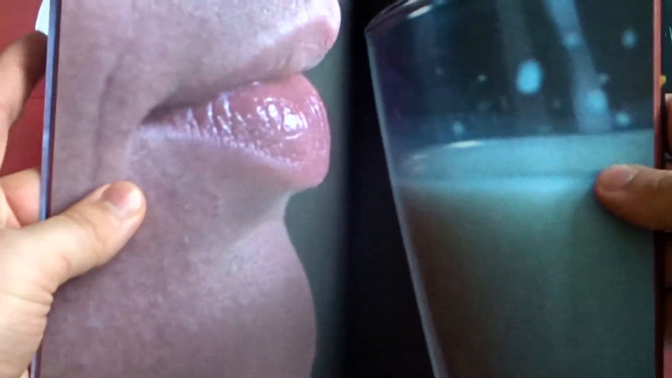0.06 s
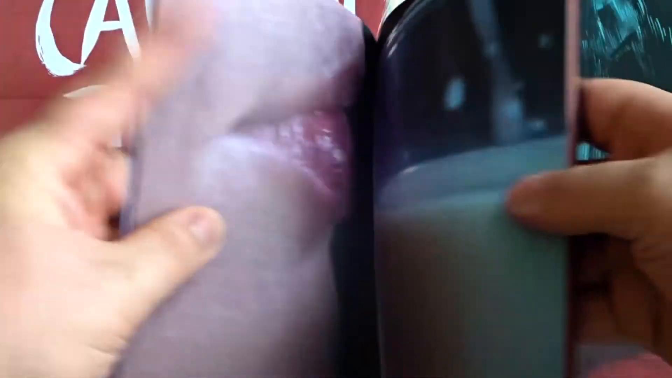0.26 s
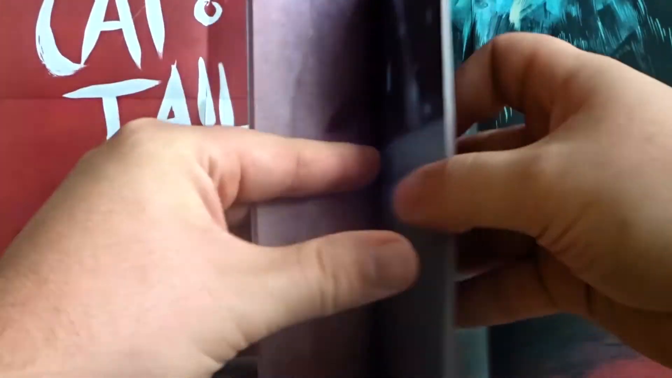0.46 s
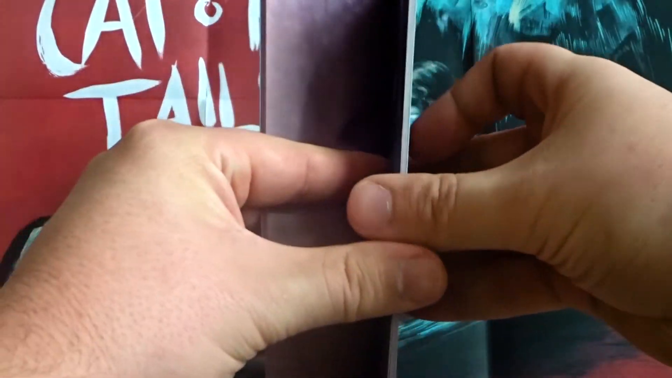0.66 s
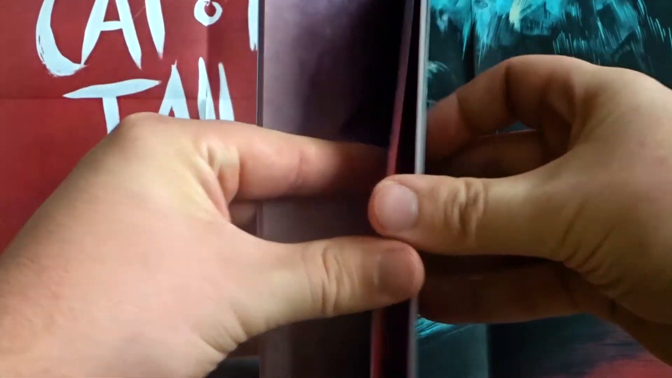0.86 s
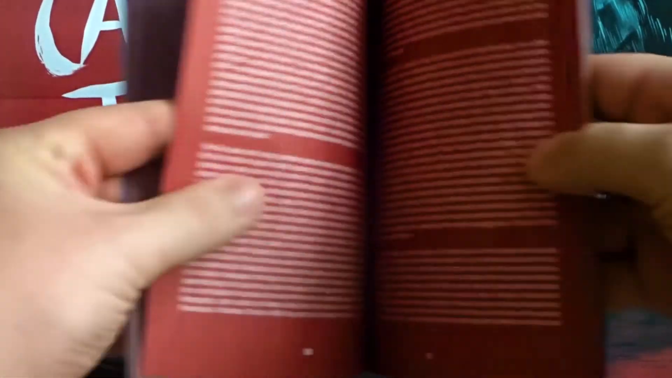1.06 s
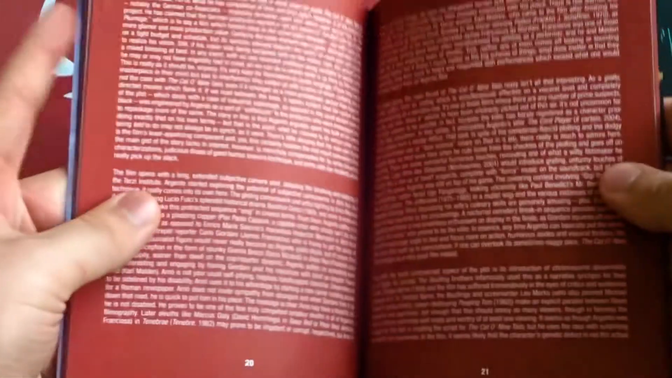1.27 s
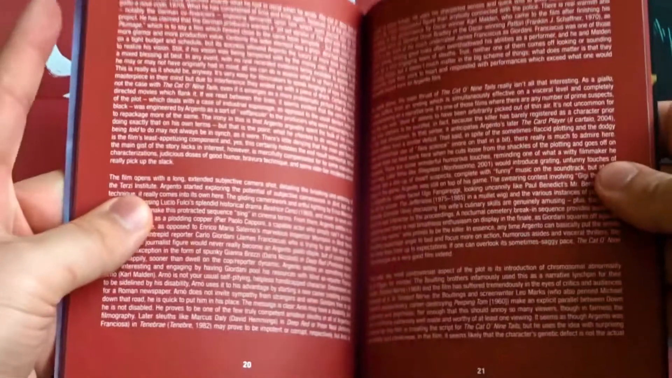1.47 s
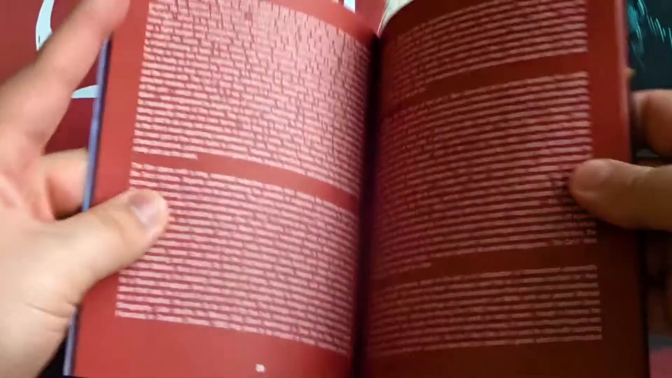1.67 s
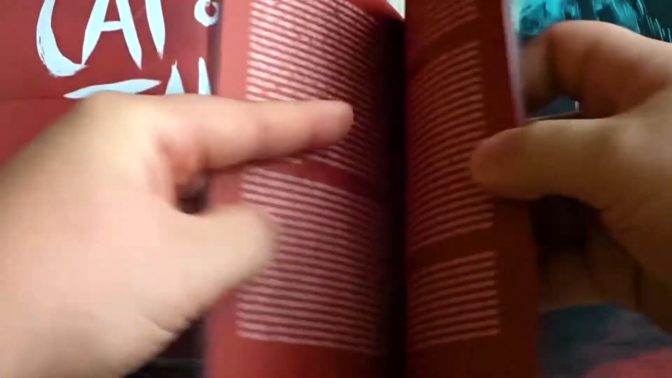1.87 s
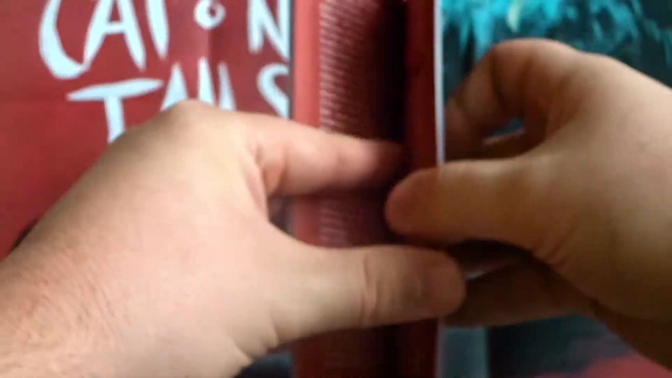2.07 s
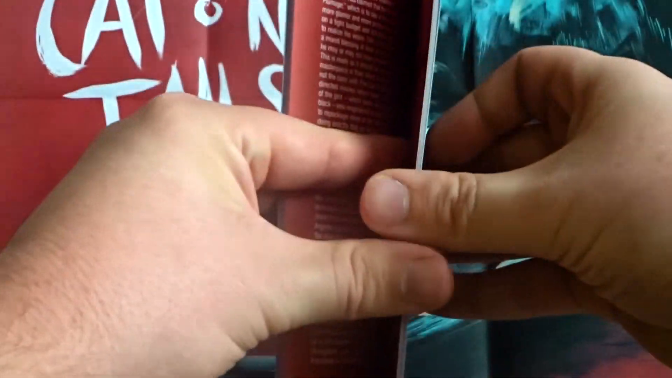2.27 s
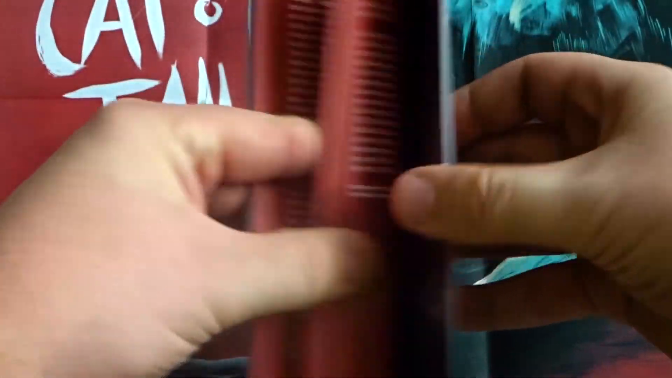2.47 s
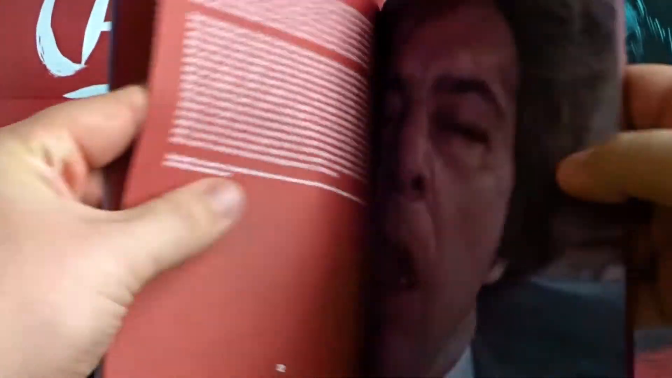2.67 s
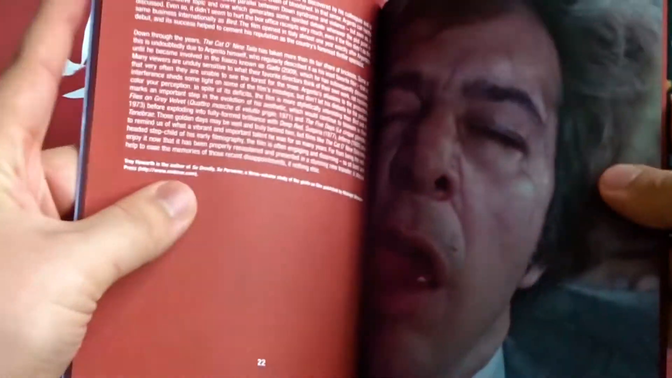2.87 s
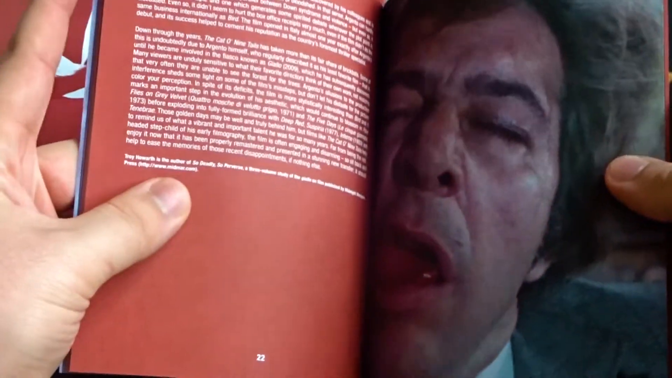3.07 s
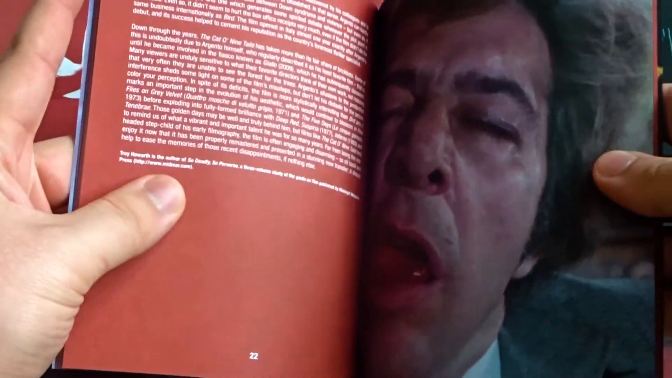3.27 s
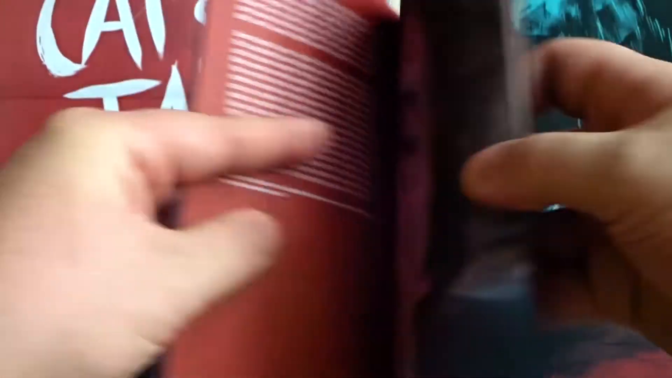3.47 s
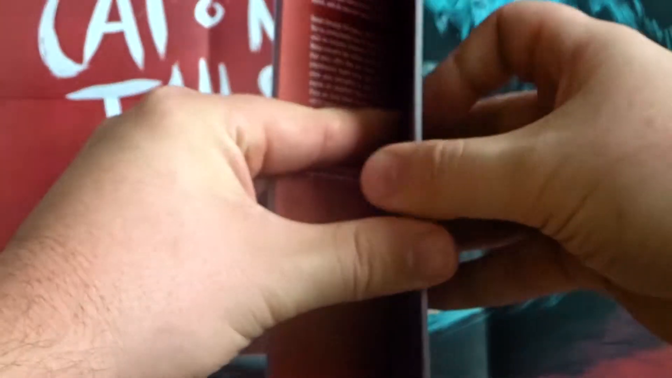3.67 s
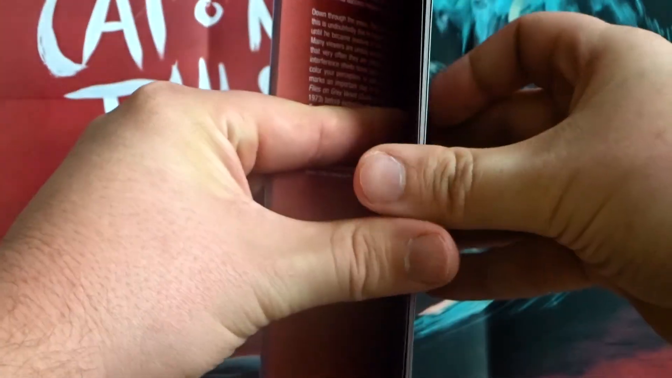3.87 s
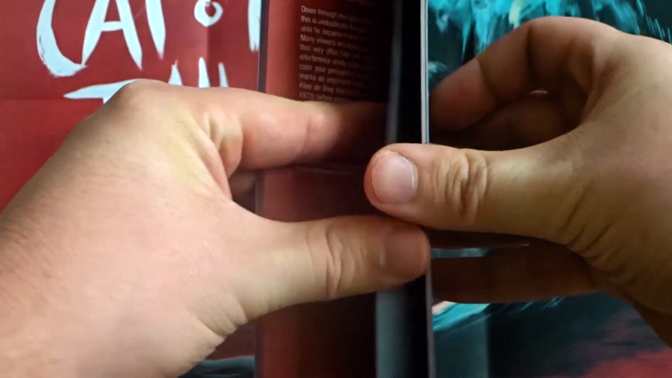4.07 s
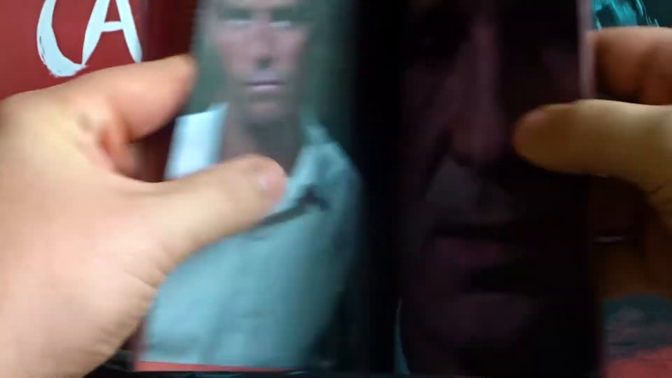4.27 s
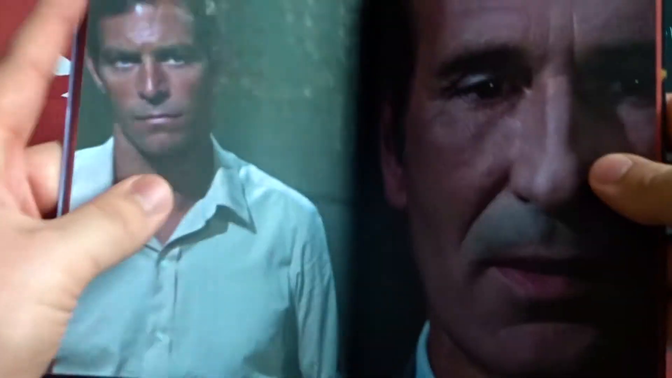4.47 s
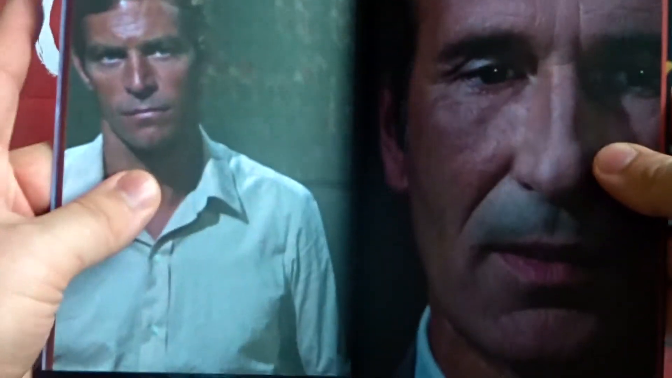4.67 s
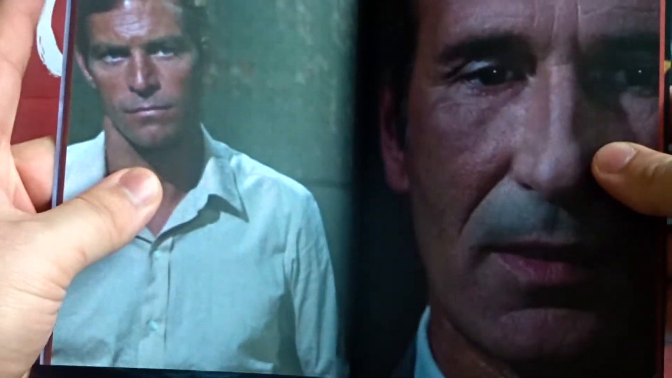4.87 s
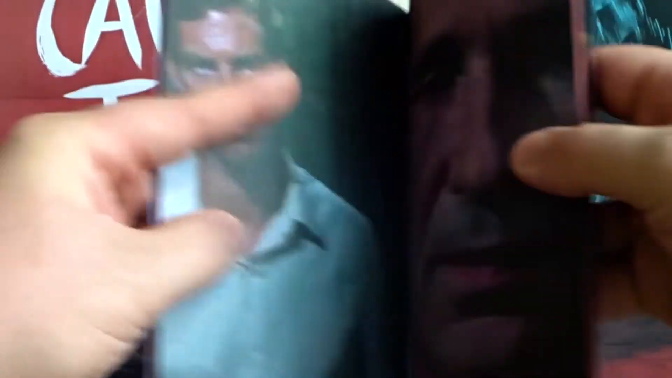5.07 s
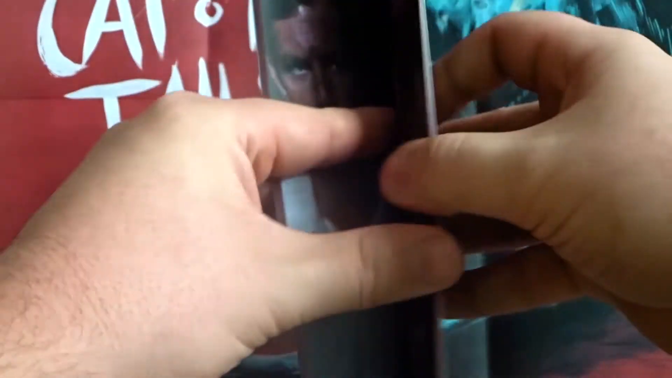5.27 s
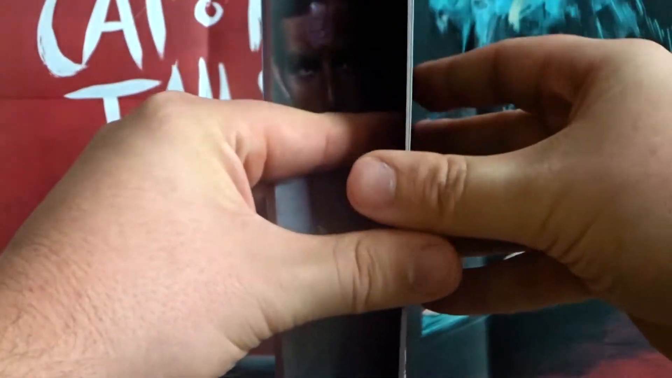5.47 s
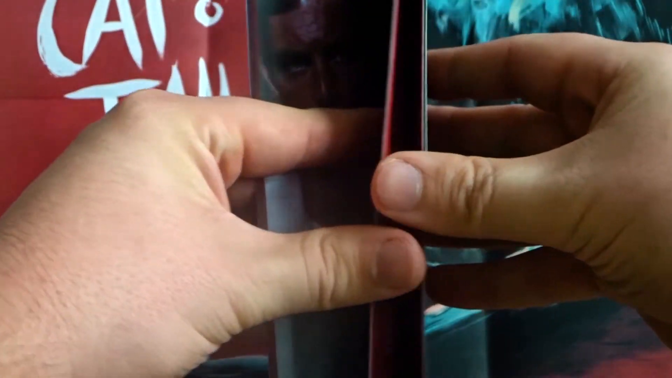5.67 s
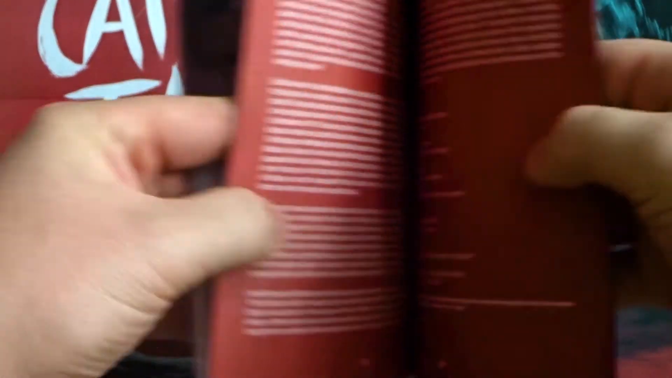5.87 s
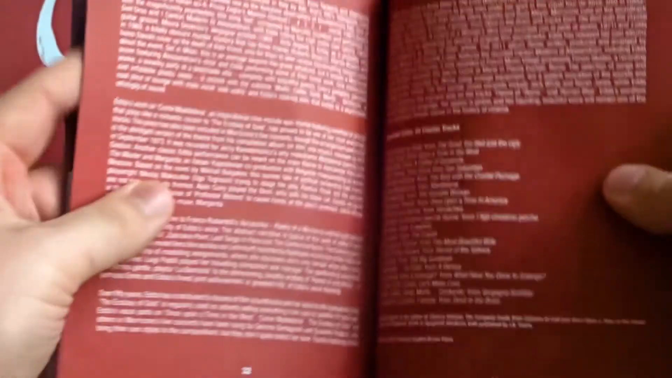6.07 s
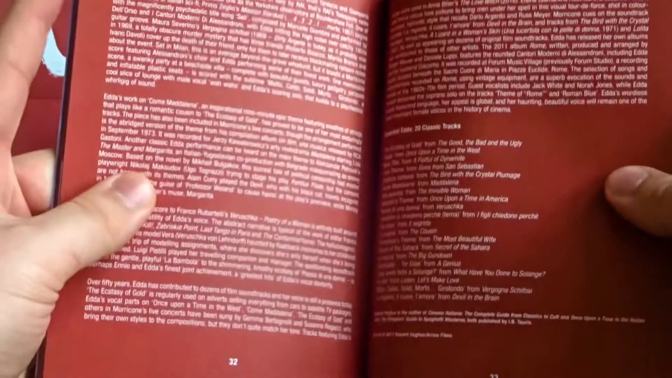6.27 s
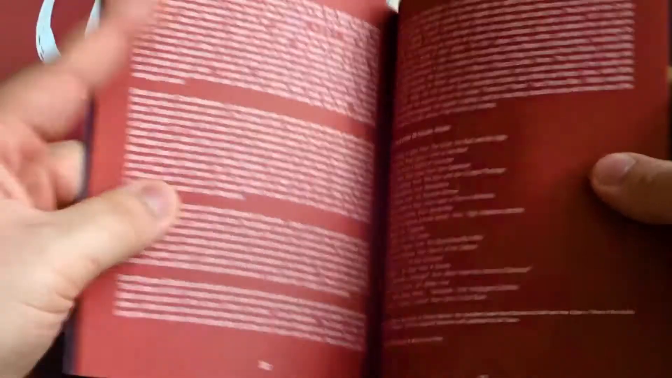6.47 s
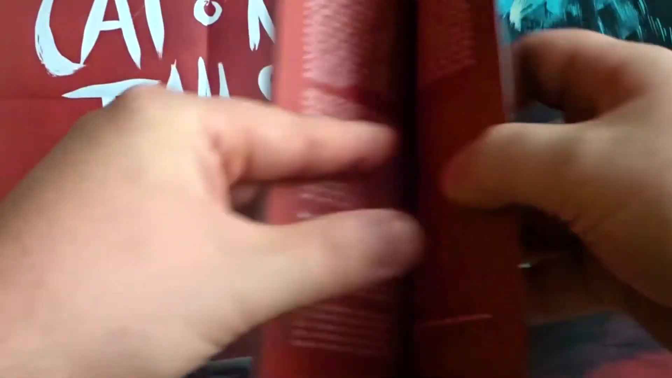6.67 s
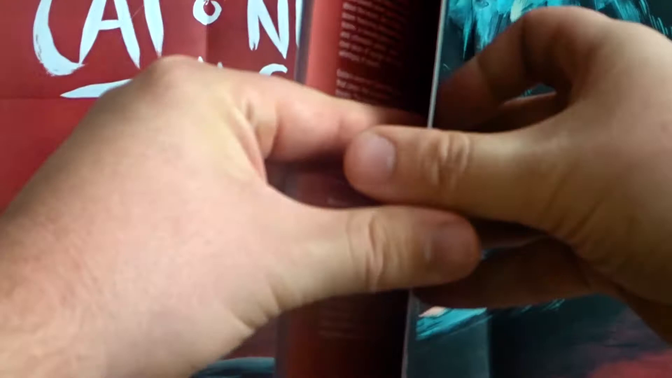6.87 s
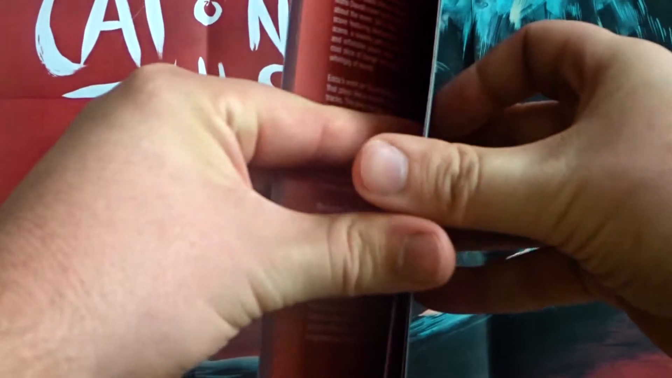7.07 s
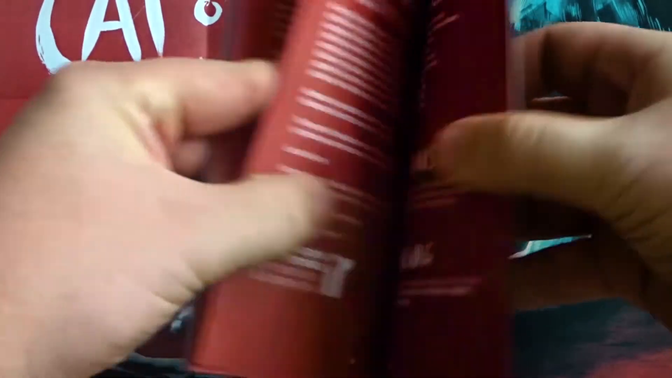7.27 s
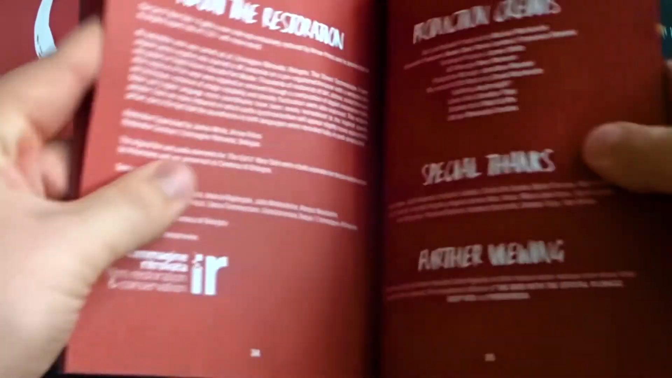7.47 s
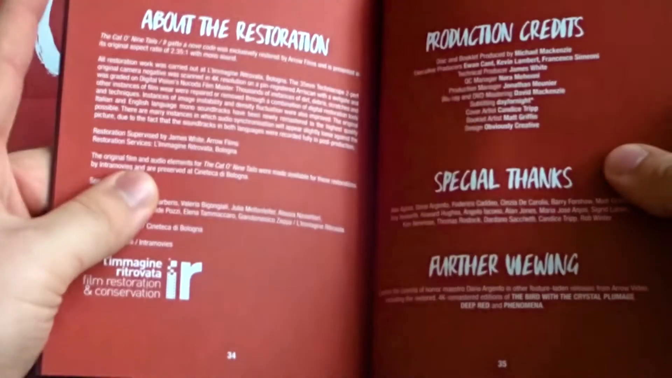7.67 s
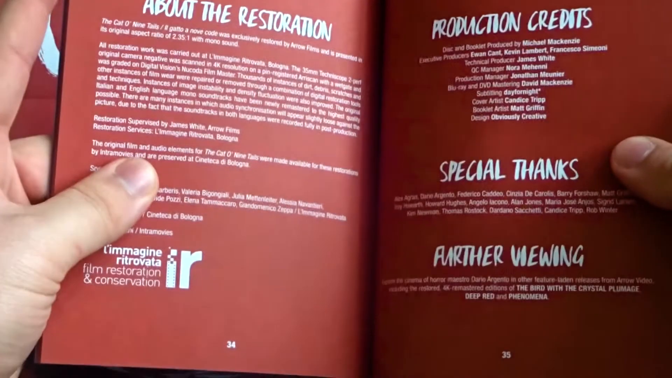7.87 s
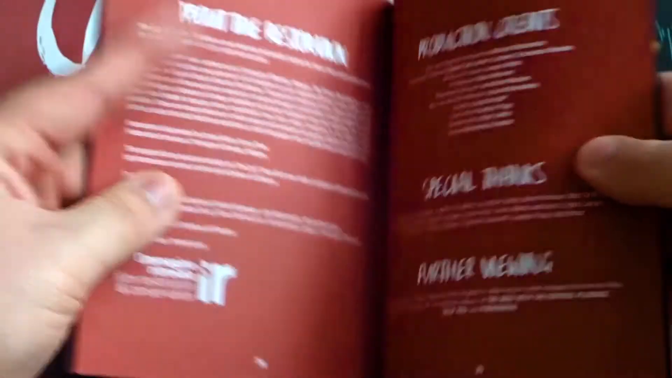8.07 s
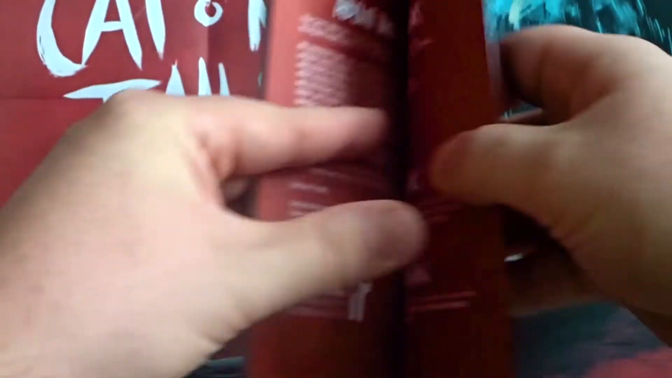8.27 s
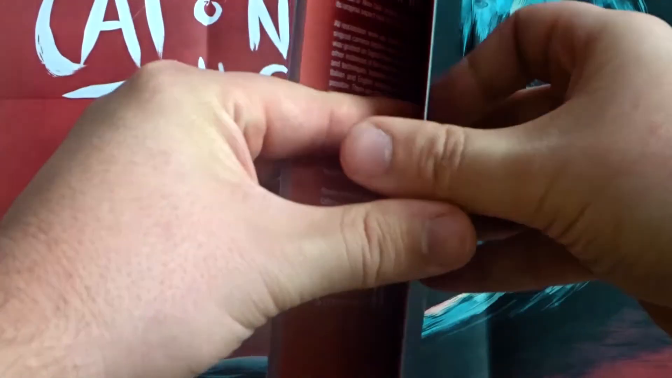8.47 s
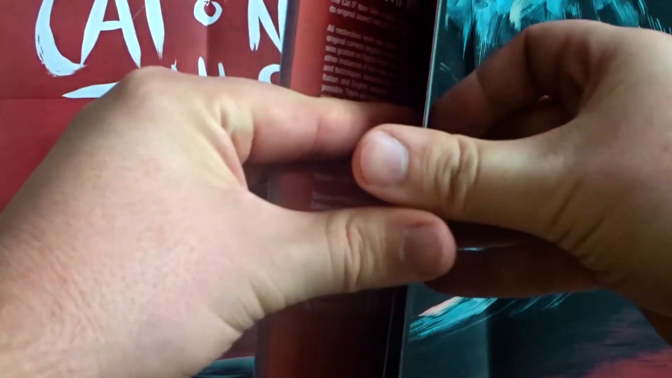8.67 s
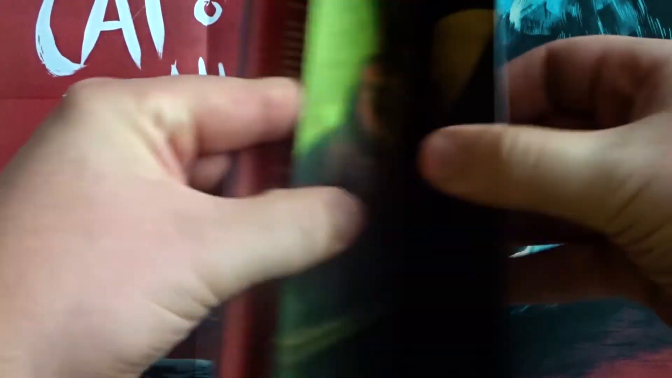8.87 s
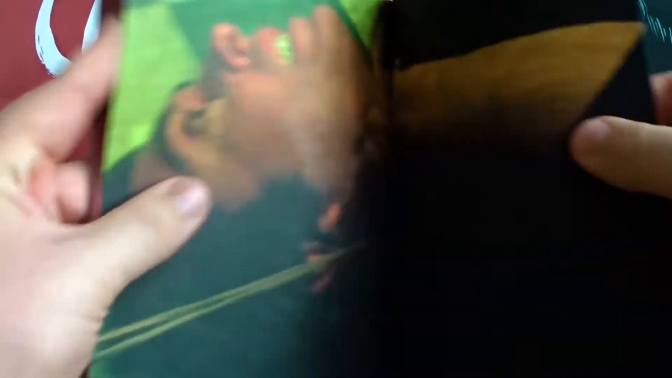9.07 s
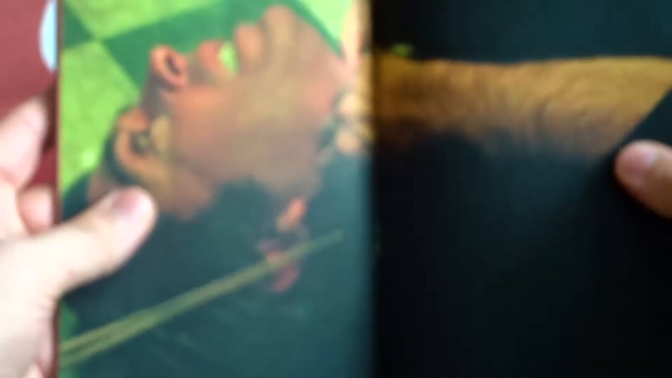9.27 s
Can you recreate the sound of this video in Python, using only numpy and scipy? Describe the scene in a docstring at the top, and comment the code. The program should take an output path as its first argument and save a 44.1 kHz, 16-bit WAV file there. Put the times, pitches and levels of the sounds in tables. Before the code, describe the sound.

A glossy booklet is leafed through by hand, very close to a stereo microphone in a small quiet room. It starts with light finger rubs and a soft sheet rustle from 0.2 to 0.45 s. At 1.0 s a page edge ticks off the thumb, knocks, and sweeps over in a bright crinkly swish until 1.33. Small taps and rubs follow around 1.4 to 2.1. A sharper flick at 2.55 leads into another swish until 2.9, then quiet rustles near 3.5. The strongest snap comes at 4.2, with a crisp slide to 4.54. Rubbing near 5.1 and 5.4 precedes a softer, looser turn at 5.9 to 6.25. More handling at 6.6, a clicking turn at 7.3 to 7.67, gentle rubs at 8.1 to 8.4, and a last quick flick and swish at 8.9 to 9.2. Faint fan hum, airy rush and hiss continue throughout.

```python
"""Hands turn the glossy pages of a booklet close to a small stereo microphone in a quiet room.
Rubbing fingers, bent edges and sliding pages hiss as noise grains and ring the air wedge between the sheets.
Landing pages and tapping fingers knock, thud and crack; page edges slip off the thumb in bursts of ticks;
moving sheets whistle briefly. All are filtered noise, returned by table and walls as sparse echoes.
Behind them the room and a distant fan hum and rush, and the microphone hisses."""
import sys
import numpy as np
from scipy import signal
from scipy.fft import rfft, irfft, next_fast_len
from scipy.io import wavfile
from scipy.ndimage import uniform_filter1d

SR = 44100
rng = np.random.default_rng(int(sys.argv[2]) if len(sys.argv) > 2 else 0)


def transcribe(u):
    """Save the signal u as a 16-bit wav file named by the first command-line argument.

    u: samples, shape (n,) or (channels, n), limited to [-1, 1]; the rate is SR.
    q: integer samples, one column per channel.
    """
    v = np.clip(np.atleast_2d(u).T, -1, 1)
    q = np.round(v * 32767).astype(np.int16)
    wavfile.write(sys.argv[1], SR, q)


N = 411453  # length [samples]


def gain_of(db):
    """Amplitude factor of a level."""
    return 10 ** (np.asarray(db) / 20)


def evened(x):
    """Scaled to rms 1."""
    return x / np.sqrt(np.mean(x ** 2) + 1e-20)


def peaked(x):
    """Scaled to peak 1."""
    return x / abs(x).max()


def read(points, hz):
    """Value of a spectrum table, straight on a log-frequency axis."""
    f, value = np.transpose(points)
    return np.interp(np.log(hz + 1), np.log(f + 1), value)


def add(mix, start, sound):
    """Mixes a sound in at time start [s]."""
    part = mix[round(start * SR):][:len(sound)]
    part += sound[:len(part)]


def resonate(x, hz, width):
    """A resonance: shifts the steady or gliding pitch hz down to zero, smooths, and shifts back."""
    turn = np.exp(2j * np.pi * np.cumsum(hz * np.ones(x.shape[-1])) / SR)
    r = np.exp(-np.pi * width / SR)
    smooth = signal.lfilter([1 - r], [1, -r], x / turn + 1e-18)
    return 2 * (turn * smooth).real


def band(x, hz, width):
    """Two resonances in a row, the second twice as wide."""
    return resonate(resonate(x, hz, width), hz, 2 * width)


def coloured(x, points):
    """Filters a long sound by a (frequency [Hz], level [dB]) table."""
    size = next_fast_len(x.shape[-1])
    gain = gain_of(read(points, np.fft.rfftfreq(size, 1 / SR)))
    return irfft(rfft(x, size) * gain, size)[..., :x.shape[-1]]


def bright(x, hz):
    """Keeps what lies above hz."""
    return signal.sosfilt(signal.butter(N=2, Wn=hz, btype="high", fs=SR, output="sos"), x)


def room_air(patchy_db=1.8, air_db=-54.5, microphone_db=-69):
    """Steady air and microphone hiss, with the fuzzy hum and rush of a distant fan, all from one stereo noise."""
    # spectrum of the room air: (frequency [Hz], relative density [dB per Hz])
    air_points = [(12, -23), (20, -12), (86, -8), (161, -4), (205, -6.5), (240, -3.5), (408, -7.5),
                  (476, -6.5), (509, -9.5), (1060, -13), (1540, -13.5), (2200, -17.5), (4000, -25.5),
                  (5200, -31.5), (8800, -120)]
    # left-right likeness of the room air: (frequency [Hz], correlation [-1 to 1])
    likeness_points = [(60, 1), (130, 0.65), (290, 0.31), (640, -0.39), (1410, -0.37), (3100, -0.58),
                       (6820, 0.47), (15000, 1.0)]
    # hum of the fan, alike on both sides: (frequency [Hz], width [Hz], level [dB])
    hum_bands = [(117.3, 6.7, -73), (160.1, 7.8, -71.5), (238.9, 9.7, -72.5)]
    # whistling air of the fan: (frequency [Hz], width [Hz], level [dB])
    rush_bands = [(1580, 200, -68), (1830, 300, -68)]
    frames, hz = N // 512 + 5, np.fft.rfftfreq(2048, 1 / SR)
    a, b, c, d, patches = rng.standard_normal((frames, 1025, 5)).T
    patches = evened(uniform_filter1d(uniform_filter1d(patches, 20, axis=0), 8, axis=1))
    likeness = np.clip(read(likeness_points, hz), -1, 1)[:, None]
    left = a + 1j * b
    right = likeness * left + np.sqrt(1 - likeness ** 2) * (c + 1j * d)
    z = np.array([left, right]) * gain_of(patchy_db * patches)
    white = signal.istft(z, nperseg=2048, noverlap=1536)[1][:, :N]
    air = gain_of(air_db) * evened(coloured(white, air_points))
    hum = sum(gain_of(db) * evened(band(white[0], f, width)) for f, width, db in hum_bands)
    blended = white + 0.43 * white[::-1]  # each side takes in some of the other
    rush = sum(gain_of(db) * evened(band(blended, f, width)) for f, width, db in rush_bands)
    return air + hum + rush + gain_of(microphone_db) * evened(bright(white, 2000))


def short_stroke(start, length, start_db, end_db, wedge_db, hz, shine_db):
    """The hiss runs straight from start to end while the wedge swells and sinks and its pitch climbs."""
    share = 0.56  # the wedge rings most at this share of a stroke
    ends_db, glide = -11, 0.17  # wedge level at both ends re its top [dB], whole climb as a share of hz
    return [(start, start_db, wedge_db + ends_db, hz * (1 - share * glide), shine_db),
            (start + share * length, start_db + share * (end_db - start_db), wedge_db, hz, shine_db),
            (start + length, end_db, wedge_db + ends_db, hz * (1 + (1 - share) * glide), shine_db)]


def stroke(t, rows, rise_db_per_s, fall_db_per_s):
    """Hiss, wedge, pitch and shine of one stroke, fading in before its rows and out after them."""
    linger_db, linger_db_per_s = -12.5, 57  # the sheets keep whispering after a stroke
    times, *columns = np.transpose(rows)
    early, late = np.maximum(times[0] - t, 0), np.maximum(t - times[-1], 0)
    fall_db = np.maximum(-fall_db_per_s * late, linger_db - linger_db_per_s * late)
    fade_db = fall_db - rise_db_per_s * early
    hiss_db, wedge_db, hz, shine_db = [np.interp(t, times, c) for c in columns]
    return hiss_db + fade_db, wedge_db + fade_db, hz, shine_db


def contact():
    """All strokes together: powers add, and louder strokes weigh more in pitch and shine."""
    # short strokes: a finger rubs a page, a thumb bends its edge, or a turning page slides briefly:
    # (time [s], length [s], hiss at the start [dB], hiss at the end [dB],
    # wedge top [dB], wedge pitch at its top [Hz], shine [dB per octave])
    short_strokes = [(0.032, 0.021, -64, -62, -62, 1700, 2), (0.174, 0.031, -67, -54, -69, 1900, 2),
                     (0.224, 0.047, -50, -55, -66, 2060, 4.5), (0.278, .165, -54.5, -57.5, -50, 2410, 4),
                     (.45, 0.14, -69, -64, -64, 2030, 0.), (.97, .06, -69, -51, -53.5, 2200, 6),
                     (1.426, 0.038, -54.5, -56.5, -68, 1900, 0.), (1.582, 0.011, -52, -65, -68, 1800, 2),
                     (1.612, 0.014, -59, -58, -68, 1800, 1), (1.69, 0.088, -53, -58.5, -57.5, 2100, 1),
                     (1.806, 0.16, -58.5, -55, -49.5, 2410, 2.5),
                     (2.009, 0.081, -59.5, -58.5, -55.5, 2400, 0.5), (2.097, 0.13, -65, -70, -76, 1800, -3),
                     (2.393, 0.018, -66, -71, -72, 1800, 13), (2.52, 0.052, -65, -49, -50, 2200, 2),
                     (2.988, 0.058, -51, -62, -58.5, 1900, 2), (3.41, 0.14, -57, -58, -55, 2350, 1),
                     (3.514, 0.047, -51.5, -52, -44.5, 2800, -2), (3.566, 0.07, -67, -64, -61, 2100, -1),
                     (3.7, 0.055, -61, -63, -77, 1800, 3), (3.766, 0.023, -57, -57, -75, 1900, 0),
                     (4.142, 0.015, -54, -64, -66, 1900, 1), (4.954, 0.043, -53.5, -61, -63, 1800, 1),
                     (5.028, 0.19, -56.5, -55.5, -54, 2360, 0.5),
                     (5.181, 0.068, -50.5, -55, -52, 2720, 1.5),
                     (5.362, 0.023, -50.5, -47, -52, 2230, -2.5), (5.405, 0.053, -56, -71, -61, 1800, 1.5),
                     (5.804, 0.042, -55.5, -49.5, -64, 1900, 3), (5.867, 0.033, -48, -50, -51, 1900, -0.5),
                     (6.39, 0.023, -58.5, -64, -68, 1700, -4.5), (6.49, 0.1, -58, -59, -61, 1800, 1),
                     (6.607, 0.097, -53.5, -55, -47.5, 3040, -2.5),
                     (6.724, 0.12, -58, -72, -68, 2000, -4.5), (7.253, 0.05, -59, -59, -46, 2500, 2),
                     (8.088, .07, -56, -60, -62, 1800, 3), (8.17, 0.22, -53.5, -56, -54.5, 1920, 0.),
                     (8.397, 0.13, -69, -67, -63, 1850, -2), (8.878, 0.093, -59.5, -55, -47.5, 2340, -2),
                     (8.952, .03, -47, -49, -44, 2300, 2)]
    # a freed page slides over the one below, the main slide of each turn as a curve: (time [s], hiss [dB],
    # ring of the air wedge between the pages [dB], wedge pitch [Hz], shine of the hiss [dB per octave])
    turns = [
        [(1.04, -60, -49, 2360, -9), (1.09, -43, -47.5, 2600, 0), (1.134, -52.5, -53.5, 2160, -2.5),
         (1.182, -42, -51.5, 2430, -0.5), (1.234, -45.5, -47.5, 2510, 2.5), (1.262, -43, -56, 2010, 6),
         (1.278, -41, -46, 2120, -0.5), (1.304, -38, -53, 2490, 3.5), (1.33, -50, -52, 2580, 0)],
        [(2.575, -53, -50, 2380, 8), (2.607, -47, -45, 2810, 5), (2.637, -43.5, -50, 2870, 3.5),
         (2.675, -44, -48, 2990, 5.5), (2.697, -54, -55, 2750, -2), (2.729, -42.5, -48, 2590, 2.5),
         (2.865, -44, -60, 2730, 1), (2.889, -41.5, -49, 2840, 3), (2.9, -46.5, -64, 2930, -0.5)],
        [(4.23, -43, -43.5, 2140, 5), (4.254, -51.5, -51, 2300, 3), (4.338, -42.5, -45.5, 3400, 1),
         (4.358, -54, -52, 3070, 1.5), (4.384, -42, -42, 2650, 2.5), (4.422, -42, -50, 2430, 0.5),
         (4.452, -45, -54, 2760, 2), (4.518, -36.5, -45, 2930, 5), (4.54, -48, -57, 3120, 0)],
        [(5.945, -53.5, -58, 1960, 1.5), (5.987, -44.5, -51, 1700, 5), (6.007, -47, -61, 1790, 0),
         (6.023, -57, -63, 2070, -2), (6.043, -44.5, -57, 2080, -1), (6.103, -42.5, -53.5, 2170, 5.5),
         (6.139, -49, -62, 1920, 4.5), (6.201, -46, -52, 2200, 2), (6.24, -54, -60, 1880, -1)],
        [(7.335, -48, -51, 2520, -2), (7.389, -41, -47, 2660, 5), (7.425, -46.5, -52.5, 2870, 1),
         (7.479, -48, -45, 2420, 5), (7.513, -42, -53, 2590, 2), (7.561, -46, -62, 3010, 0.5),
         (7.621, -50.5, -64, 2950, 4.5), (7.655, -45, -69, 2570, 0), (7.67, -50.5, -74, 2480, 0)],
        [(8.98, -50, -56, 2610, 1), (9.02, -45, -43, 2440, 1.5), (9.036, -47.5, -55, 2470, -1),
         (9.078, -43.5, -45, 2700, 1.5), (9.086, -41, -39.5, 2630, -1), (9.114, -42.5, -56, 2720, 3),
         (9.15, -44, -44.5, 2580, -0.5), (9.168, -38, -43, 2600, 1), (9.195, -46, -56, 2720, -3)],
    ]
    # steady faint hiss and mid-band rush beneath the strokes:
    # (hiss [dB], rush [dB], rush pitch [Hz], shine [dB per octave])
    floor = (-66.5, -70.5, 1702, 0.5)
    t = np.arange(N // 32 + 2) * 32 / SR  # one point every 32 samples
    strokes = [stroke(t, rows, rise_db_per_s=287, fall_db_per_s=596) for rows in turns]
    strokes += [stroke(t, short_stroke(*row), rise_db_per_s=1200, fall_db_per_s=700) for row in short_strokes]
    strokes += [np.outer(floor, np.ones(len(t)))]
    hiss_db, wedge_db, hz, shine_db = np.swapaxes(strokes, 0, 1)
    hiss, wedge = gain_of(2 * hiss_db), gain_of(2 * wedge_db)  # powers
    joint = (10 * np.log10(hiss.sum(0)), 10 * np.log10(wedge.sum(0)),
             (wedge * hz).sum(0) / wedge.sum(0), (hiss * shine_db).sum(0) / hiss.sum(0))
    return [np.interp(np.arange(N) / SR, t, c) for c in joint]


def slide(grains_per_s=12000, spread_db=1.3, patchy_db=1.4, wedge_width=1700):
    """Dense fibre catches hiss in drifting patches and ring the air wedge between the pages."""
    # spectrum of the paper hiss: (frequency [Hz], relative density [dB per Hz])
    fibre_points = [(470, -47), (800, -9.5), (1320, -6.5), (1750, -1), (2310, -15), (2620, -4), (3000, -6),
                    (5810, -3), (8660, -6.5), (14100, -6.5), (15800, -11)]
    hiss_db, wedge_db, wedge_hz, shine_db = contact()
    caught = rng.random(N) < grains_per_s / SR
    size = gain_of(spread_db * np.minimum(rng.exponential(1, N), 3)) * caught
    grains = evened(size * rng.standard_normal(N)) + 1.2 * rng.standard_normal(N)
    hz, t, z = signal.stft(grains, SR, nperseg=256)
    patches = uniform_filter1d(uniform_filter1d(rng.standard_normal(z.shape), 5, axis=0), 14, axis=1)
    # shine tilts the hiss about 8 kHz, level below 2 kHz
    octaves = np.log2(np.maximum(hz, 2000) / 8000)[:, None]
    tilt_db = octaves * np.interp(t * SR, np.arange(N), shine_db)
    grains = signal.istft(z * gain_of(patchy_db * evened(patches) + tilt_db), SR)[1][:N]
    hiss = evened(coloured(grains, fibre_points)) * gain_of(hiss_db)
    wedge = band(size * rng.standard_normal(N), wedge_hz, wedge_width)
    return hiss + evened(wedge) * gain_of(wedge_db)


def slap(db, thud_db, hz, crack_db):
    """One sudden push sets off a short knock of the sheet, a dull thud of the stack and a crack."""
    t = np.arange(6000) / SR
    push = rng.standard_normal((3, len(t))) * np.minimum(t / 0.0002, 1)
    short = gain_of(-60 * t / 0.018)  # down 60 dB in 18 ms
    # the blow, then the sheets settle
    jolt = gain_of(-60 * t / 0.0056) + 0.055 * push[0] * gain_of(-60 * t / 0.16)
    thud = resonate(jolt, hz, 63) + 0.49 * resonate(jolt, 403, 220) + 0.4 * resonate(jolt, 823, 330)
    thud = bright(resonate(thud, 870, 1140), 200)
    knock = resonate(resonate(push[1] * short, 1850, 900), 2300, 2500)
    crack = bright(push[2] * short, 5500)
    return gain_of(db) * (peaked(knock) + gain_of(thud_db) * peaked(thud) + gain_of(crack_db) * peaked(crack))


def slip(db, hz, treble_db, ms):
    """A flurry of tiny releases rings the bent page edge and spits some treble."""
    t = np.arange(1500) / SR
    age = t / ms * 2500  # in units of 0.4 length
    force = age * np.exp(-age)  # rises fast, dies within ms
    ticks = rng.standard_normal((2, len(t))) * force
    ring = resonate(ticks[0], hz, 410) + 0.5 * resonate(ticks[0], 0.9 * hz, 2000)
    # the edge is too small for bass and too soft for treble
    ring = bright(resonate(ring, 1.3 * hz, 2900), 0.46 * hz)
    return gain_of(db) * (peaked(ring) + gain_of(treble_db) * peaked(bright(ticks[1], 12000)))


def whistle(length, hz, db):
    """Air squeezed through the slit between two pages: a fuzzy band that swells and fades."""
    tone = band(rng.standard_normal(8000), hz, 0.09 * hz)[:round(length * SR)]
    return gain_of(db) * evened(tone) * np.hanning(len(tone))


def walls(x, t60=0.15):
    """Table and walls return sparse taps of random sign, other ones for each side."""
    # returned sound: (frequency [Hz], level [dB])
    return_points = [(80, -45), (200, -4), (400, -2.5), (800, -2.5), (1600, -5.5), (3500, -14), (8000, -69),
                     (16000, -64)]
    at = np.arange(60, 12000, 20) + rng.integers(0, 20, (2, 597))  # one tap in every 20 samples
    taps = np.zeros((2, 12040))
    np.put_along_axis(taps, at, rng.choice([-1., 1.], at.shape) * gain_of(-60 * at / SR / t60), axis=1)
    echoes = signal.fftconvolve(x[None], taps / np.linalg.norm(taps[0]), axes=1)[:, :N]
    return coloured(echoes, return_points)


def scene():
    """The booklet, a little to the left, its echoes and the room."""
    # a page or finger lands: (time [s], knock peak [dB], thud re knock [dB], thud pitch [Hz], crack re knock [dB])
    slaps = [(0.171, -55, 5, 400, 9), (0.2144, -45.5, 5, 420, 11.5), (0.395, -46.5, 0.5, 400, 7),
             (0.88, -41.5, -1.5, 387, -8), (1.0282, -25.5, -1.5, 1140, -3.5), (1.3116, -39.5, 0, 260, -5),
             (1.4352, -35.5, 1, 440, 2.5), (1.6833, -45, 7.5, 440, 11), (1.7, -37.5, 3.5, 950, 4.5),
             (1.972, -47, 5, 226, 2), (2.151, -39.5, -4.5, 380, -14), (2.2407, -40.5, -3.5, 406, -16),
             (2.5613, -30.5, 1, 312, 3), (2.9862, -45, 5, 403, 3), (3.4055, -46, 1, 240, 1),
             (3.7701, -48, -11, 310, 11), (4.2133, -23.5, -5.5, 515, 3.5), (4.9507, -44.5, 2, 384, 3),
             (5.1519, -45.5, 4.5, 305, 13), (5.2719, -42, -13, 281, -7), (5.6386, -45, 4.5, 273, -11),
             (5.688, -38.5, -5.5, 420, -24), (5.8628, -34, -1.5, 295, -1), (5.9834, -49, 4, 345, 4),
             (6.0514, -39.5, -1, 1080, 8), (6.0777, -44.5, 5.5, 220, 2), (6.1176, -44, 2, 428, 1),
             (6.576, -46, 3, 229, -8), (7.3234, -34.5, 3, 445, -15), (7.6329, -45, 13, 860, -9),
             (8.076, -39.5, -3.5, 444, 5.5), (8.146, -51, 6.5, 390, -1), (8.181, -51, 6, 226, 14),
             (8.377, -42, -6, 256, -12), (8.9472, -32.5, -2.5, 290, -5), (8.968, -32, -2.5, 413, 5.5),
             (9.1643, -42, -3, 340, -11), (9.1818, -44.5, 2.5, 390, -10)]
    # a page edge slips off the thumb: (time [s], ring peak [dB], pitch [Hz], treble re ring peak [dB], length [ms])
    slips = [(0.9971, -33, 1850, -27, 3.2), (1.001, -30, 1770, -23, 9.4), (1.004, -43, 1570, -22, 2.6),
             (2.5234, -44, 1950, -19, 2.7), (2.531, -31, 1970, -19, 8.2), (2.537, -35, 2590, -17, 3.5),
             (2.5417, -25.5, 1650, -1.5, 4.3), (2.5472, -16, 2010, -14, 2.25), (2.551, -28, 2130, -4, 2.6),
             (4.1827, -37, 2510, -18, 3.8), (4.1913, -35, 2480, -15, 2.7), (4.1962, -17.5, 1880, -20, 8.9),
             (4.1994, -13, 1770, -8, 2), (4.204, -26, 1730, -7, 2), (5.909, -44, 1630, -10, 4.4),
             (7.2936, -37, 2140, -23, 4.2), (7.3041, -21.5, 2420, -3, 1.1), (7.3054, -20.5, 2060, -3, 6),
             (7.3205, -30, 2120, 4, 3.3), (8.919, -33, 2380, -16, 8.4), (8.951, -27.5, 1830, 1, 2.5)]
    # the sliding page sings for a moment: (time [s], length [s], pitch [Hz], level before the swell [dB])
    whistles = [(1.258, 0.035, 1920, -48), (1.267, 0.056, 2600, -47.5), (2.614, 0.053, 9550, -45),
                (2.73, 0.074, 2600, -53), (2.8, 0.085, 6000, -49), (4.27, .09, 9600, -48),
                (4.43, .09, 5570, -47), (5.083, 0.18, 2650, -54), (6.06, .07, 13000, -46),
                (7.122, 0.038, 11900, -62), (7.485, 0.062, 7150, -47.5), (7.575, 0.057, 6450, -48.5),
                (7.581, 0.12, 11500, -53), (8.728, 0.036, 11800, -57), (9.04, 0.074, 14000, -42)]
    # left over the middle for the booklet: (frequency [Hz], level [dB])
    lean_points = [(400, 0.), (1000, .8), (2500, .3), (5000, 0.)]
    booklet = slide()
    for sound, events in ((slap, slaps), (slip, slips), (whistle, whistles)):
        for start, *settings in events:
            add(booklet, start, sound(*settings))
    left = coloured(booklet, lean_points)
    right = 2 * booklet - left
    return np.array([left, right]) + walls(booklet) + room_air()


def record(dry):
    """The band limit of the recorder: a steep low-pass near 16 kHz."""
    low_pass = signal.firwin(511, 15950, window=("kaiser", 9), fs=SR)
    return signal.oaconvolve(dry, low_pass[None], "same")


dry = scene()
out = record(dry)
transcribe(out)
```